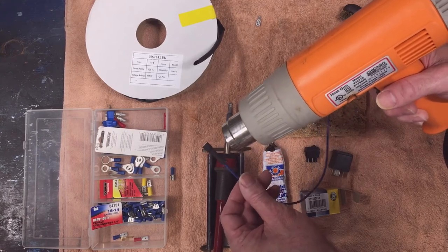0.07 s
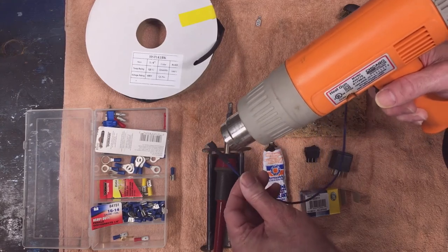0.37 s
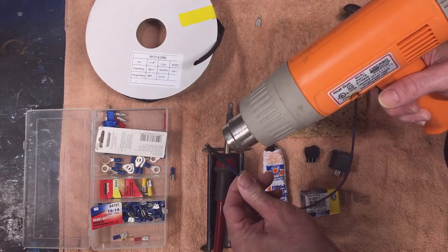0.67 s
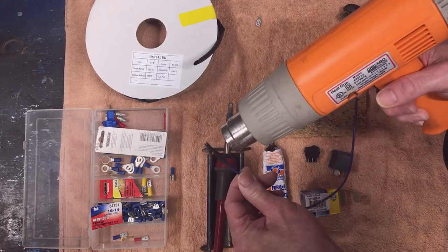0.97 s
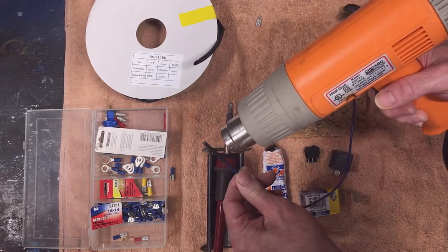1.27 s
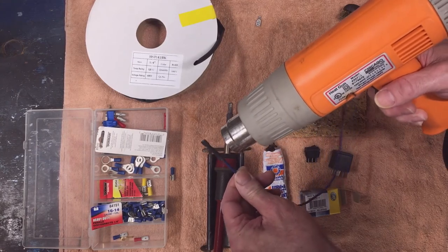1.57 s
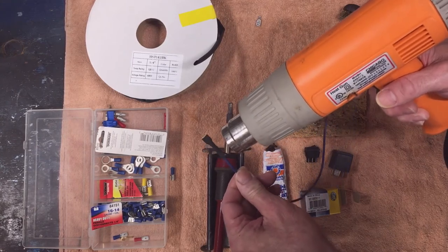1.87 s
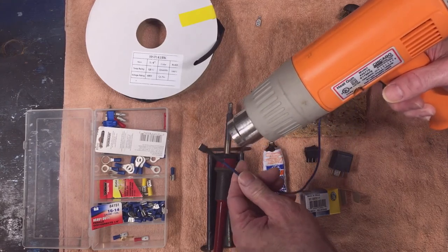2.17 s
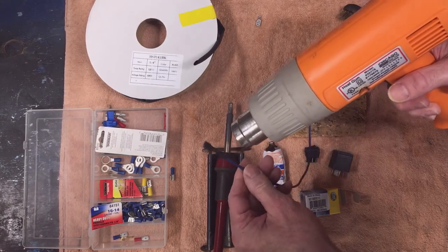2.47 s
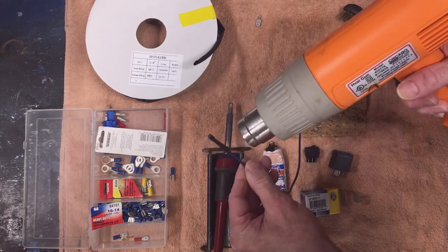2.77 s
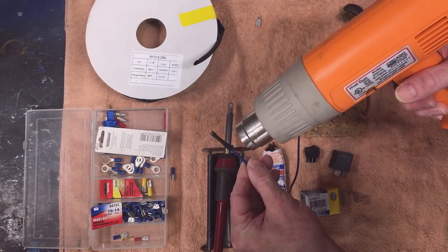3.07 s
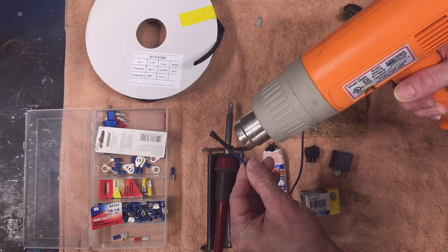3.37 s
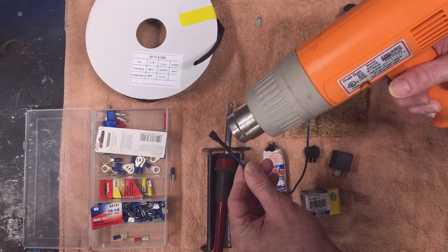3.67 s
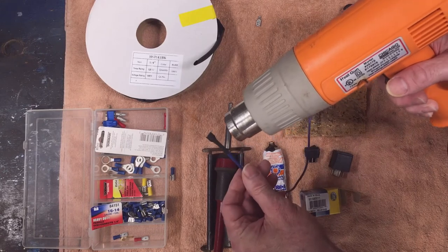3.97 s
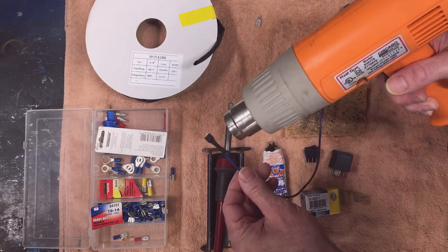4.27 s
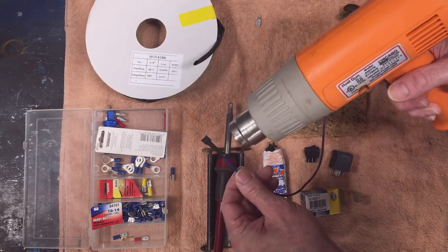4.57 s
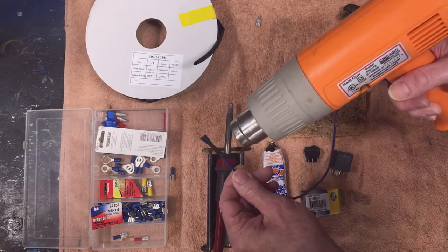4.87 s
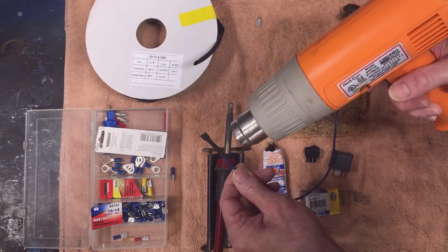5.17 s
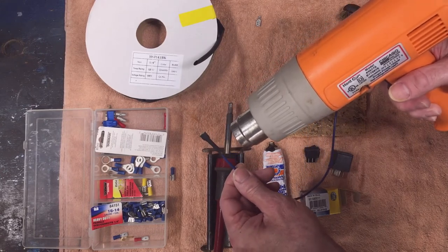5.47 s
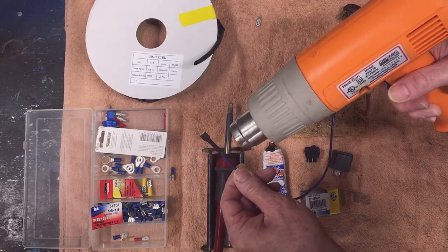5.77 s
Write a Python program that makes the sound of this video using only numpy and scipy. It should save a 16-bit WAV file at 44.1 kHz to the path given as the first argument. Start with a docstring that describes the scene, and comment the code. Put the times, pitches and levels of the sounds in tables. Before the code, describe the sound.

Air blows continuously from a heat gun over a workbench, its fan motor humming and buzzing under a faint whine.

```python
"""A handheld heat gun blowing over a workbench, close to a single microphone.
From the start, turbulent air rushes through the resonant housing while a small mains-fed motor spins
the fan: shaft harmonics hum, a thin whine sings above. At 0.5 s comes a soft bump of handling.
From 1.7 s on, the hiss dips briefly a few times. After 3.3 s the hand turns the gun and the whine
fades; by 4.7 s it is back, and the gun blows on."""
import sys
import numpy as np
from scipy import signal
from scipy.fft import rfft, irfft
from scipy.io import wavfile

SR = 44100
rng = np.random.default_rng(int(sys.argv[2]) if len(sys.argv) > 2 else 0)


def wav_out(sig):
    """Save sig, one row per channel (or a flat mono array), as 16-bit PCM at SR to the path in sys.argv[1]."""
    wavfile.write(sys.argv[1], SR, np.round(np.clip(np.atleast_2d(sig).T, -1, 1) * 32767).astype(np.int16))


N = 265393
TIME = np.arange(N) / SR
RIPPLE_HZ, BAND_EDGE_HZ = 120, 15750


def amp(db):
    """Decibels to gain."""
    return 10 ** (np.asarray(db) / 20)


def unit(x):
    """Scales to rms 1."""
    return x / np.sqrt(np.mean(x ** 2) + 1e-20)


def drift(hz):
    """Random wander of rms 1, moving up to about hz times a second."""
    f = np.fft.rfftfreq(N, 1 / SR)
    return unit(irfft(rfft(rng.standard_normal(N)) * np.exp(-(f / hz) ** 2), N))


def partial(turns, order, spread=1):
    """One harmonic of rms 1; a small spread of phase lines the harmonics up into one push a turn."""
    return np.sqrt(2) * np.sin(2 * np.pi * (order * turns + spread * rng.random()))


def mains_hum(level_db=-69):
    """Far in the background, a hum at twice the mains frequency."""
    return amp(level_db) * partial(RIPPLE_HZ * TIME, order=1)


# A soft bump of handling: f/Hz, half-length/s, level/dB
HANDLING_BUMP = (50, 0.022, -57)


def handling_bump(at_s=.491):
    """The hand on the gun: a few cycles of dull thud with its octave."""
    hz, half_length_s, db = HANDLING_BUMP
    t = TIME - at_s
    envelope = amp(db) * np.exp(-(t / half_length_s) ** 2)
    return envelope * (np.cos(2 * np.pi * hz * t) + np.cos(4 * np.pi * hz * t))


# Brief dips of the hiss, all alike: t/s
DIP_TIMES = [1.655, 3.362, 3.447, 3.894, 4.429, 4.962, 5.474]


def hiss_dips(depth_db=-25, half_length_s=.015):
    """Gain that falls to the bottom of each dip and comes straight back."""
    notches = sum(np.maximum(1 - abs(TIME - at_s) / half_length_s, 0) for at_s in DIP_TIMES)
    return 1 - (1 - amp(depth_db)) * notches


# The shaft's almost even speed: t/s, f/Hz
SHAFT_SPEED = [(0.0, 284.59), (1.6, 284.59), (2.15, 284.33), (3.15, 285.24), (3.75, 284.73), (4.65, 284.74),
               (5.35, 285.1), (6.02, 284.52)]


def shaft_turns(wobble=.0004, ripple_turns=.0016):
    """Turns of the shaft: the speed wobbles, and each pulse of rectified mains nudges the rotor."""
    shaft_hz = np.interp(TIME, *np.transpose(SHAFT_SPEED)) * (1 + wobble * drift(8.4))
    return np.cumsum(shaft_hz) / SR + ripple_turns * np.sin(2 * np.pi * RIPPLE_HZ * TIME)


# Broad spectrum of the air rush at close range: f/Hz, relative level/dB
AIR_SPECTRUM = [(25, -39), (55, -25), (100, -22.5), (180, -15.5), (500, -13.5), (740, -9.5), (1050, -2),
                (2600, -4), (4450, -0.5), (4800, -15.5), (6000, -17), (7500, -25.5), (10500, -37),
                (15600, -48.5)]
# Resonances and notches of the housing and barrel: f/Hz, width/Hz, gain/dB
HOUSING_RESONANCES = [(287, 37, 7), (555, 61, 10.5), (787, 8.5, 8.5), (877, 84, 8), (1157, 119, 5),
                      (1252, 18, 9), (1307, 53, 4.5), (1706, 113, 8.5), (1993, 131, 9.5), (2306, 165, 3.5),
                      (2970, 280, 2.5), (3270, 180, -3), (3920, 254, 7), (4150, 55, 3.5), (4330, 49, 3.5),
                      (5710, 490, 4), (6100, 250, -2.5), (9400, 800, 2), (11600, 810, 2)]


def housing_db(hz):
    """Colour of the air rush: a broad hump with the peaks and notches of the housing on it."""
    points_hz, points_db = np.transpose(AIR_SPECTRUM)
    hump_db = np.interp(np.log(hz + 1), np.log(points_hz), points_db)
    bells = (db * .5 ** ((2 * (hz - centre) / width) ** 2) for centre, width, db in HOUSING_RESONANCES)
    return hump_db + sum(bells)


def brushes(turns, level_db=-64, scatter_db=4, sway_db=2, lowest_order=26):
    """Brush contact adds a thin buzz of high harmonics, coloured like the air."""
    shaft_hz = SHAFT_SPEED[0][1]
    buzz = np.zeros(N)
    for order in range(lowest_order, int(BAND_EDGE_HZ / shaft_hz)):
        db = housing_db(order * shaft_hz) + scatter_db * rng.standard_normal() + sway_db * drift(1)
        buzz += amp(db) * partial(turns, order)
    return amp(level_db) * unit(buzz)


# The whine beams at the microphone and fades as the hand turns the gun: t/s, level/dB
WHINE_LEVEL = [(0.0, -57), (0.55, -51.5), (3.3, -52), (3.65, -59), (4.35, -62), (4.65, -50.5), (6.02, -50)]
# The hum's octave swells and sags: t/s, level/dB
OCTAVE_LEVEL = [(0.0, -42.5), (0.8, -43), (1.7, -40), (2.17, -49), (2.75, -41), (4.45, -40), (5.7, -45),
                (6.02, -43.5)]


def motor(turns, mean_hum_db=-40.5, hum_swell=0.2, hum_flutter_db=0.08, whine_flutter_db=1.05):
    """Rotor unbalance hums at the shaft speed and its octave; the commutator whines high above."""
    whine_db = np.interp(TIME, *np.transpose(WHINE_LEVEL))
    octave_db = np.interp(TIME, *np.transpose(OCTAVE_LEVEL))
    hum_db = mean_hum_db + hum_swell * (whine_db.mean() - whine_db)  # swells as the whine turns away
    hum = amp(hum_db) * partial(turns, order=1) + amp(octave_db) * partial(turns, order=2)
    whine = amp(whine_db + whine_flutter_db * drift(25)) * partial(turns, order=24)
    return amp(hum_flutter_db * drift(17)) * hum + whine


# Buzz of the fan blades: multiple of the shaft speed, level/dB
FAN_HARMONICS = [(3, -52), (4, -42), (5, -38.2), (6, -38.7), (7, -46), (8, -57), (9, -56), (10, -40),
                 (11, -43), (12, -42), (13, -44.4), (14, -48), (15, -46.8), (16, -53), (17, -58.2),
                 (18, -62), (19, -59.3), (20, -62.3), (21, -63), (23, -63.5), (25, -63.6)]


def fan(turns, sway_db=-0.03, flutter=0.034, flutter_hz=22, faint_db=-54):
    """Uneven blades buzz; each harmonic sways with the hand and flutters in the turbulent intake."""
    strong, faint = np.zeros((2, N))
    for order, db in FAN_HARMONICS:
        strength = amp(db + sway_db * drift(4.4)) * (1 + flutter * drift(flutter_hz))
        tone = strength * partial(turns, order, spread=.55)
        if db > faint_db:
            strong += tone
        else:
            faint += tone
    return strong + faint * hiss_dips()


def bench_echoes(direct, echo_db=-17, spacing_s=.003, sway_s=.00006, count=3):
    """Bench reflections reach the microphone late and comb the sound; the combs slide as the gun drifts."""
    delays = (spacing_s * (k + rng.random()) + sway_s * drift(0.4) for k in range(count))
    return direct + amp(echo_db) * sum(np.interp(TIME - delay, TIME, direct) for delay in delays)


def air_rush(turns, level_db=-28.5, chop=0.13, gust_db=0.33):
    """Up front, turbulence chopped once a turn rings the housing; strong resonances ride out the dips."""
    jet = rng.standard_normal(N) * (1 + chop * np.sin(2 * np.pi * turns))
    jet *= amp(gust_db * drift(19))
    colour = amp(housing_db(np.fft.rfftfreq(N, 1 / SR)))
    spectrum = rfft(bench_echoes(jet)) * colour
    hiss_share = 1 / (1 + colour ** 4)  # near 1 away from the strong resonances
    hiss = irfft(spectrum * hiss_share, N)
    ringing = irfft(spectrum * (1 - hiss_share), N)
    return amp(level_db) * unit(ringing + hiss * hiss_dips())


def scene():
    """The gun at one close microphone, the same in both channels; one shaft drives motor, fan and air."""
    turns = shaft_turns()
    tones = motor(turns) + fan(turns) + brushes(turns) * hiss_dips()
    gun = tones + air_rush(turns) + mains_hum() + handling_bump()
    return np.array([gun, gun])


def record(dry):
    """A steep low-pass ends the microphone's band."""
    lowpass = signal.firwin(1023, BAND_EDGE_HZ, window=("kaiser", 9), fs=SR)
    return signal.oaconvolve(dry, lowpass[None], "same", axes=1)


dry = scene()
out = record(dry)
wav_out(out)
```